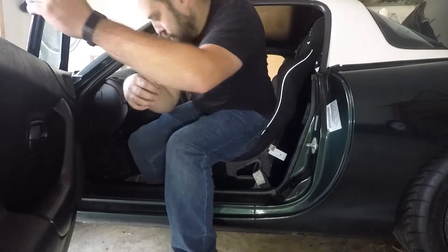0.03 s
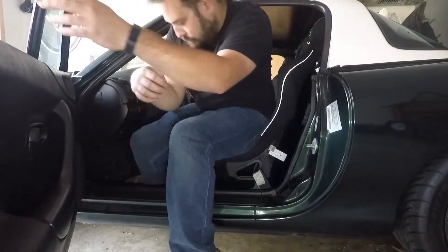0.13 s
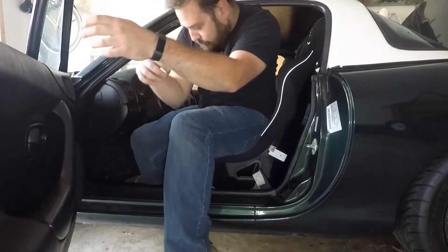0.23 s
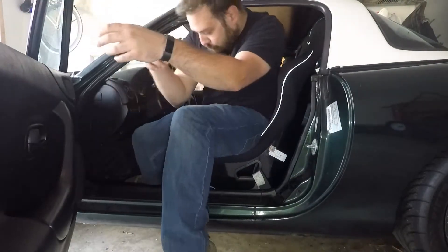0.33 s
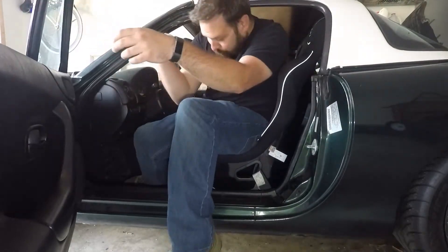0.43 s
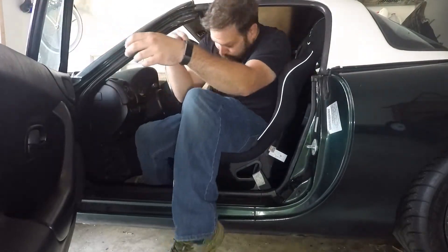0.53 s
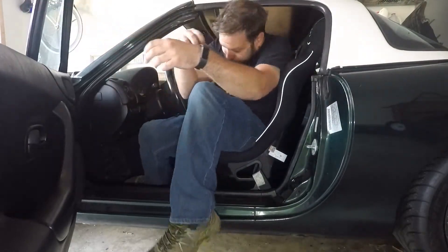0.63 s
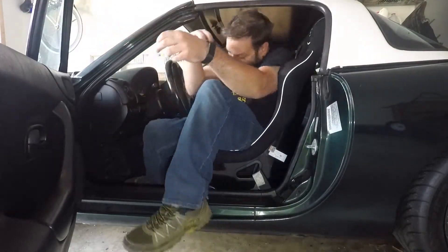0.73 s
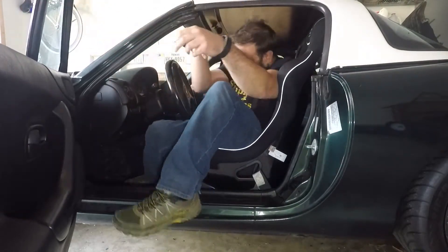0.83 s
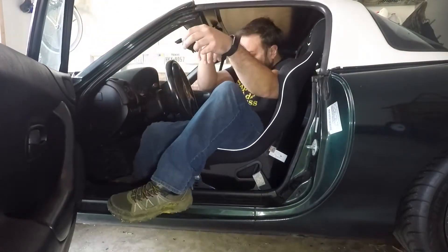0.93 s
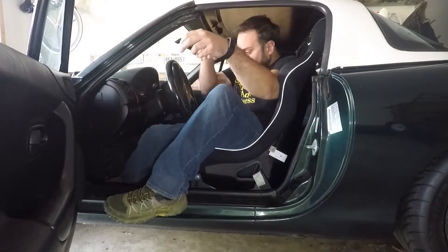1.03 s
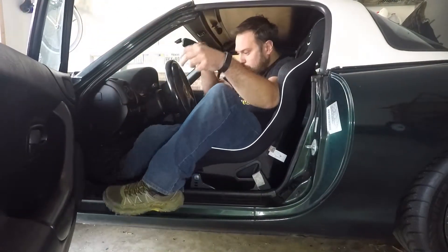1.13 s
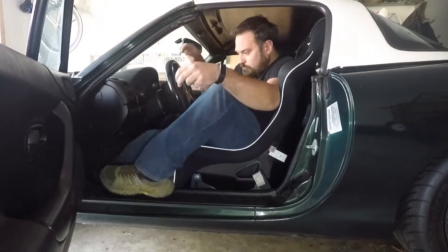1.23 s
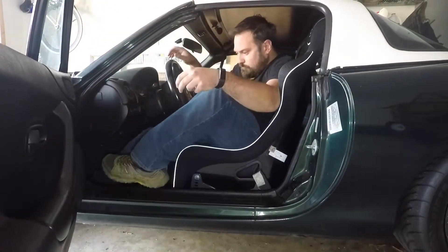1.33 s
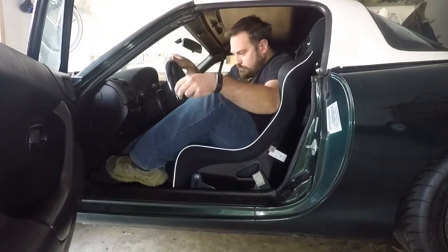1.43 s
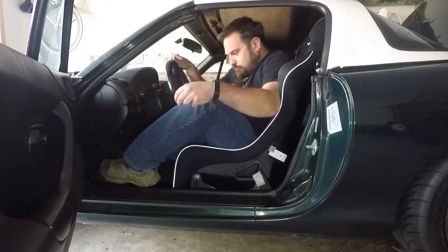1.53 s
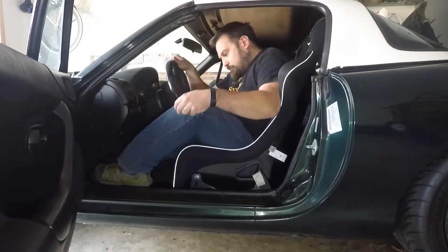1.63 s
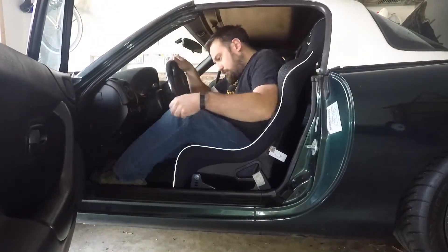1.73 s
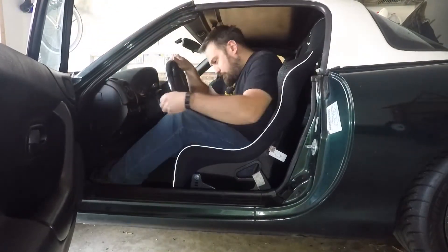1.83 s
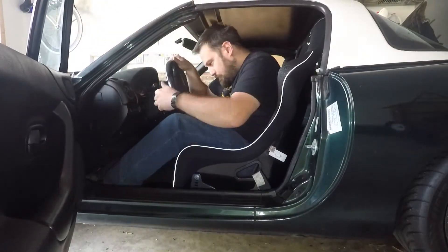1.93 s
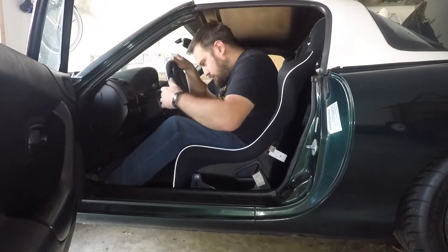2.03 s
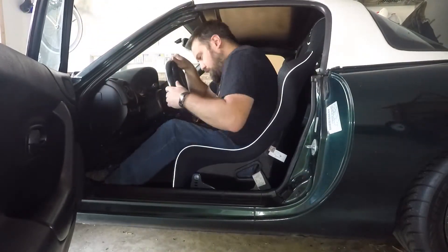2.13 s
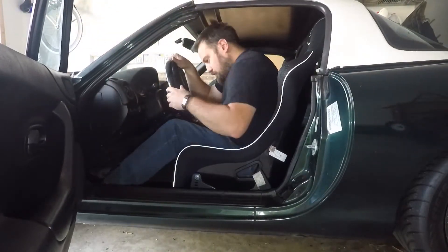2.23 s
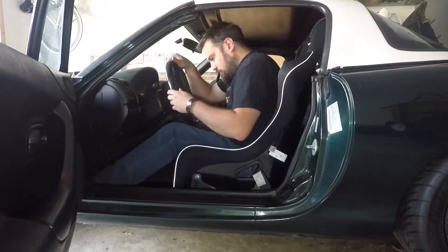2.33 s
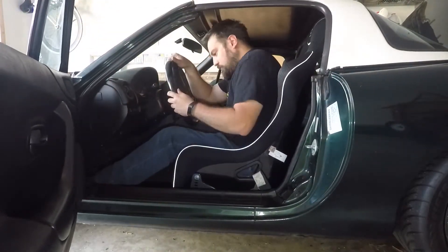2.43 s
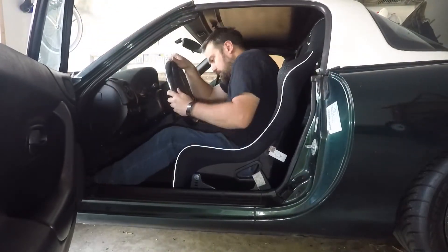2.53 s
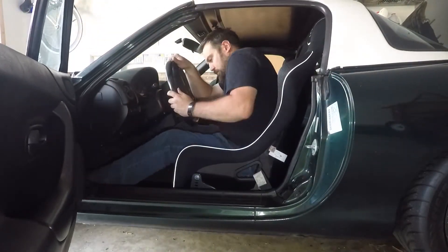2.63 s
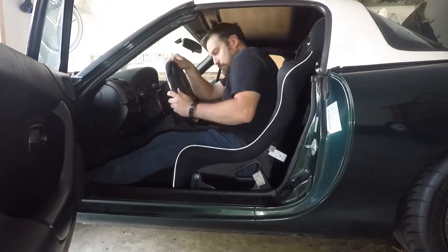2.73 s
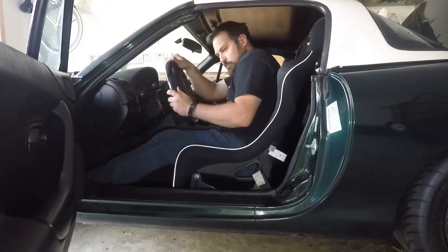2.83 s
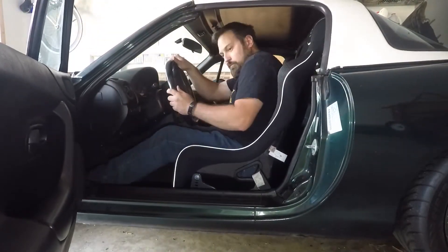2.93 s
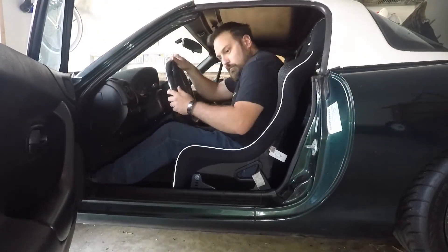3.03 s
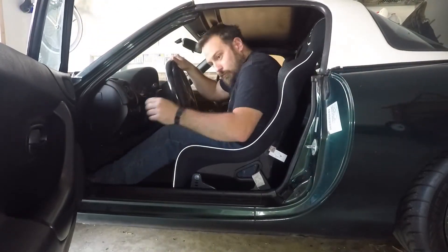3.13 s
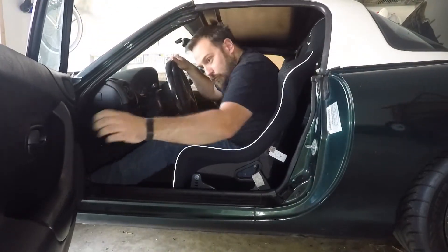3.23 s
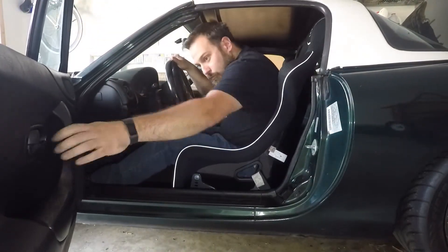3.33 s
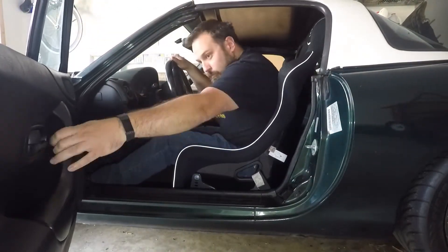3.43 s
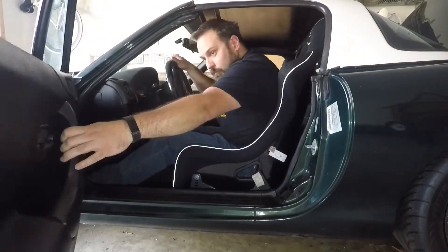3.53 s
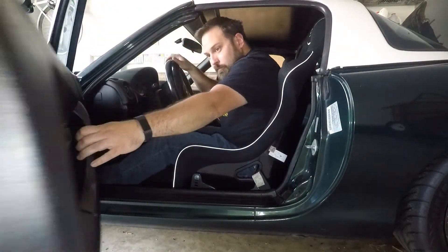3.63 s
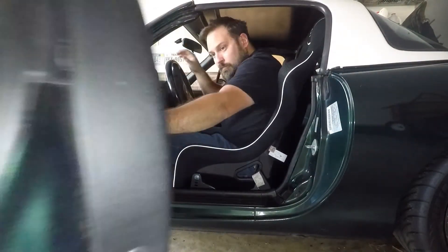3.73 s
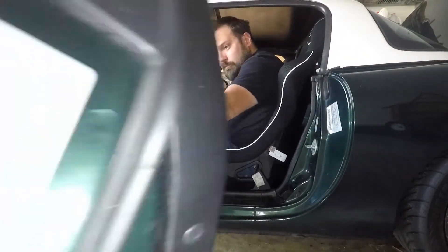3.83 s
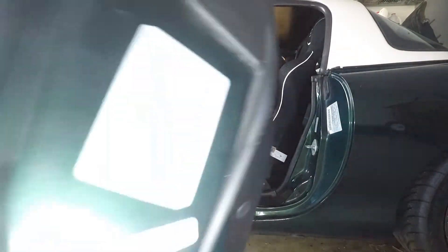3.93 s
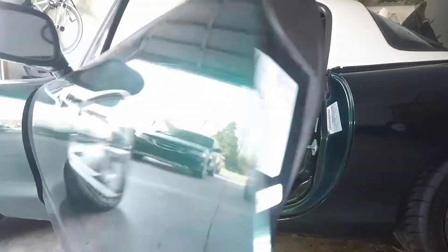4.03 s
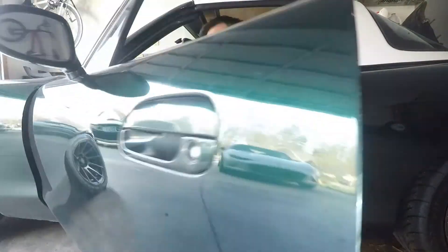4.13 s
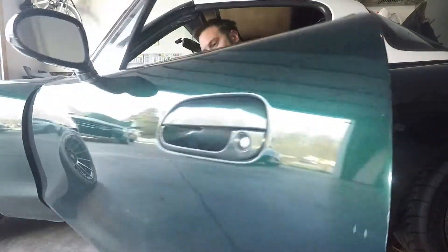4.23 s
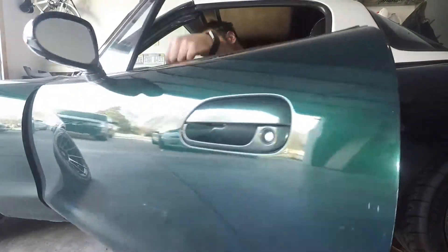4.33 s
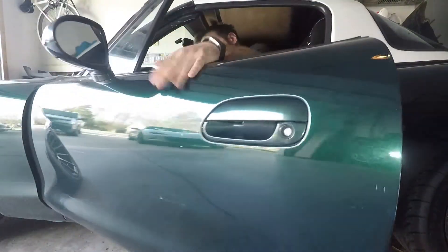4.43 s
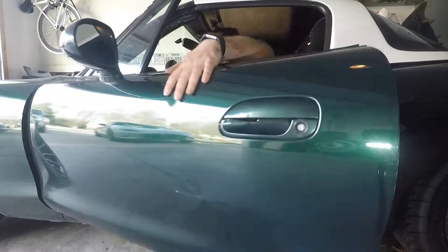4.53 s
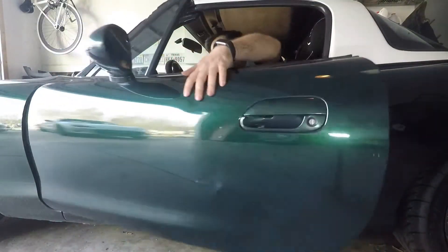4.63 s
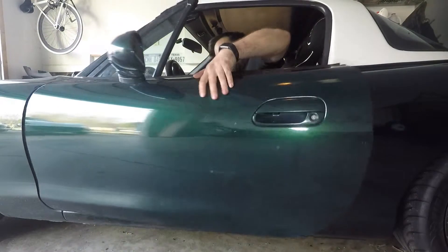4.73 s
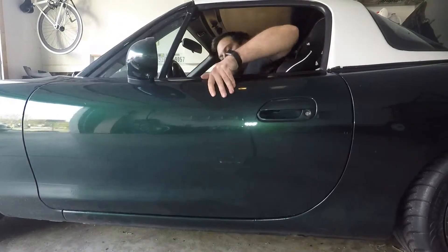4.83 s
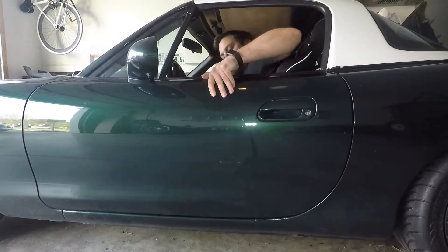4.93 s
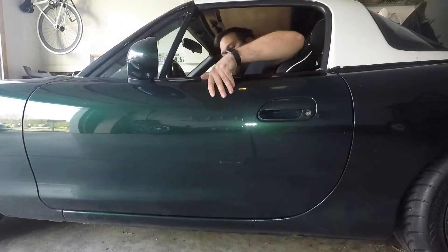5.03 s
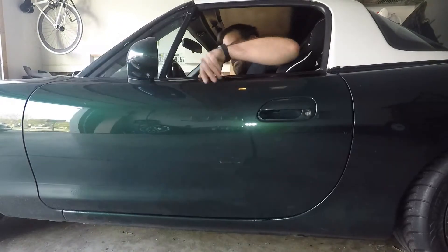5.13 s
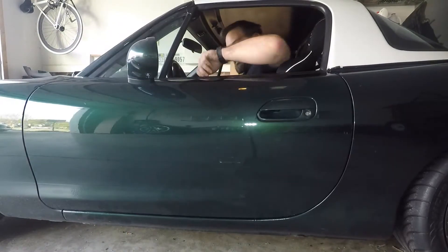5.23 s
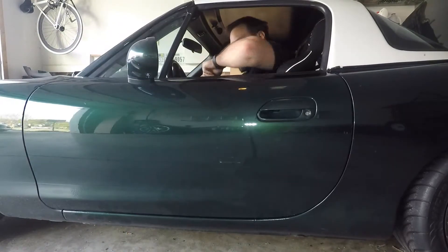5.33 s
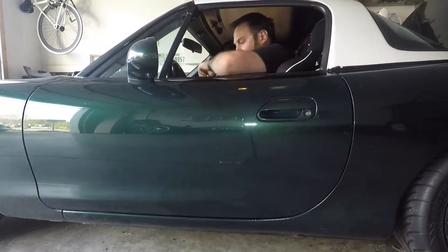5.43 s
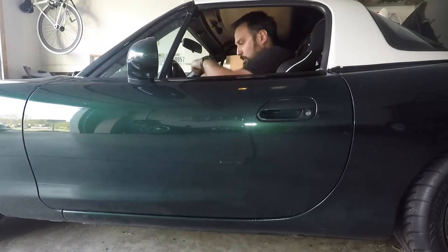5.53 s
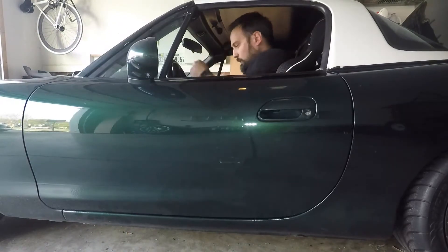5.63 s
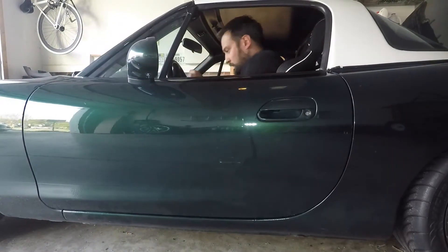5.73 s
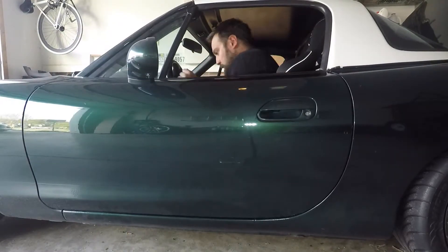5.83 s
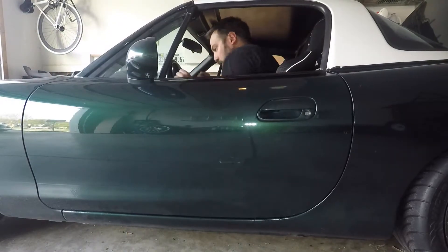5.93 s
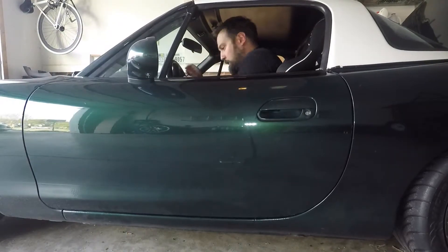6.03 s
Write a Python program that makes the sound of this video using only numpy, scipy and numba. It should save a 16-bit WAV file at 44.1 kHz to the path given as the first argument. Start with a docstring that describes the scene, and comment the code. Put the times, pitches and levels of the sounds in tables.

```python
"""In an open garage a distant machine, perhaps a rotor, buzzes and thumps about ten times a second.
From the start a driver climbs into a small car: cloth and soles rub, and shoes and knees knock.
Near 4.75 s the door slams: its panel rings, the latch snaps, the trim rattles and the garage echoes.
A small camera on the floor listens. It lets more bass through around 2 s and from the slam on,
and turns the loud slam down, recovering afterwards."""
import sys
import numpy as np
from scipy import signal
from scipy.fft import rfft, irfft
from scipy.io import wavfile
from scipy.ndimage import uniform_filter1d
from numba import njit

SR = 44100
rng = np.random.default_rng(int(sys.argv[2]) if len(sys.argv) > 2 else 0)


def generate_wav(signal):
    """Clip the signal to [-1, 1] and save it as 16-bit WAV at the path in sys.argv[1]."""
    frames = np.transpose(np.atleast_2d(signal))
    scaled = np.clip(frames, -1, 1) * 32767
    pcm = np.round(scaled).astype(np.int16)
    wavfile.write(sys.argv[1], SR, pcm)


N = 267907

# The machine's buzz over time: time_s, pulse_rate_hz, level_db, upper_harmonics_lift_db, tick_db
BUZZ_COURSE = [(0, 26.29, -47.5, -17, -83), (1.1, 26.31, -45.5, -2.5, -79), (2.2, 26.4, -44, 1, -107),
               (2.7, 25.93, -42.5, -4, -76), (3.4, 26.04, -43, -8, -57), (3.75, 26.27, -43, -3.5, -56),
               (4.1, 26.2, -43.5, 0.5, -56), (4.8, 26.35, -46, 7.5, -57), (5.4, 26.4, -45, 4, -60),
               (6.07, 26.48, -43.5, 6.5, -62)]
# How much of the air and rubbing noise both microphones share: pitch_hz, share (0 to 1)
NOISE_SHARE = [(100, 0.39), (350, 0.72), (700, 0.08), (2000, 0.069), (4000, 0.74), (8000, 0.045),
               (14000, 0.13)]
# The same for echo, rumble and door noise: pitch_hz, share (0 to 1)
ECHO_SHARE = [(100, 1), (300, 0.93), (600, 0.74), (1300, 0.014), (2300, 0.32), (4300, 0.81), (8000, 0.091),
              (14000, 0.17)]
# The camera case lifts the treble of close sounds and dulls the very top: pitch_hz, gain_db
CASE_TONE = [(6500, 0), (8000, 2), (10000, 6), (15000, -33)]


def undb(db):
    """Turn decibels into a gain."""
    return 10 ** (np.asarray(db) / 20)


def level(x, db):
    """Set a sound's average (RMS) level."""
    return x * undb(db) / np.sqrt(np.mean(x ** 2))


def curve(table):
    """Columns of a time table, one value per sample."""
    times, *columns = np.transpose(table)
    return [np.interp(np.arange(N) / SR, times, column) for column in columns]


def along(table, hz):
    """Look up a pitch in a table of pitch_hz, value."""
    pitches, values = np.transpose(table)
    return np.interp(np.log(hz + 1), np.log(pitches), values)


def shape(x, gain):
    """Filter a sound with a gain for each frequency."""
    n = x.shape[-1]
    even = n + n % 2
    return irfft(rfft(x, even) * gain(np.arange(even // 2 + 1) * SR / even), even)[..., :n]


def colour(x, tone):
    """Filter a sound with a table of pitch_hz, gain_db."""
    return shape(x, lambda f: undb(along(tone, f)))


def band(x, hz, width_hz):
    """A resonance: keep the sound near one pitch."""
    return signal.lfilter(*signal.iirpeak(hz, hz / width_hz, SR), x)


def walk(rate_hz):
    """A random wander, typically of size 1."""
    step = int(SR / rate_hz)
    wander = uniform_filter1d(np.repeat(rng.standard_normal(N // step + 1), step), step)[:N]
    return wander / wander.std()


def stereo_noise(tone, share, lag_samples=0):
    """Noise at two microphones: a shared part, which can reach the right later, plus their own."""
    common, left, right = colour(rng.standard_normal((3, N + N % 2)), tone)
    common = shape(common, lambda f: np.sqrt(along(share, f)))
    own = shape(np.array([left, right]), lambda f: np.sqrt(1 - along(share, f)))
    return (np.array([common, np.roll(common, lag_samples)]) + own)[:, :N]


def add(out, start_s, x):
    """Mix a sound in at a given time."""
    i = int(start_s * SR)
    out[..., i:i + x.shape[-1]] += x[..., :N - i]


def air():
    """A soft background hiss and a low rumble, both drifting in level."""
    # Tone of the hiss and of the rumble: pitch_hz, gain_db
    hiss_tone = [(210, -3.5), (350, -4.5), (400, -8), (550, -12), (870, -16.5), (1170, -14), (1420, -16),
                 (1630, -15), (2400, -20), (3260, -21), (4400, -21.5), (6500, -20), (7800, -28.5),
                 (10000, -29), (11500, -42), (15000, -59)]
    rumble_tone = [(20, 14), (45, 5), (100, 16), (130, 10.5), (170, 10.5), (260, 7), (400, -8), (600, -30)]
    hiss = level(stereo_noise(hiss_tone, NOISE_SHARE, lag_samples=12), -44.5) * undb(0.68 * walk(3.08))
    rumble = level(stereo_noise(rumble_tone, ECHO_SHARE), -44.5) * undb(3.3 * walk(4.06))
    return hiss + rumble


def buzz_phase():
    """How far the buzz has turned, in radians; each full turn is one pulse."""
    return 2 * np.pi * np.cumsum(curve(BUZZ_COURSE)[0]) / SR


def machine_buzz():
    """About 26 pulses a second make a wavering buzz, with a high tick on each pulse."""
    # Tones at whole multiples of the pulse rate: multiple, gain_db
    harmonics = [(2, -17), (3, -16), (4, -12), (5, -14.5), (6, -4.5), (7, -13.5), (8, 0.5), (9, -8),
                 (10, -16), (11, -13), (12, -3), (13, -15.5), (14, -16.5), (15, -29), (16, -23), (17, -22),
                 (18, -39), (20, -25.5)]
    _, level_db, lift_db, tick_db = curve(BUZZ_COURSE)
    phase, buzz = buzz_phase(), 0
    for multiple, gain_db in harmonics:
        gain = undb(gain_db + 1.82 * walk(4.4) + lift_db * (multiple > 10))
        smear = 0.021 * multiple ** 2  # the pulse arrives a little spread out
        buzz += gain * np.cos(multiple * phase + smear + 0.45 * walk(3.37))
    treble = band(band(rng.standard_normal(N), 6200, 2500), 6200, 2500)
    ticks = level(np.exp(60 * (np.cos(phase) - 1)) * treble, tick_db)
    return buzz * undb(level_db) + ticks * np.array([[1], [-1]])  # opposite signs sound wide


def machine_thumps():
    """Each thump is a short push of air, then a longer pull."""
    push_s, pull_s, lead_samples = 0.0024, 0.0051, 600
    out, t = np.zeros(N), np.arange(-lead_samples, 1200) / SR
    push = np.exp(-((t + 0.0035) / push_s) ** 2)
    pull = np.exp(-((t - 0.0045) / pull_s) ** 4)
    wave = push - pull * push.sum() / pull.sum()  # as much air returns as was pushed
    for time_s in np.arange(0.081, N / SR, 0.10245):
        late, size = rng.standard_normal(2)
        add(out, time_s - lead_samples / SR + 0.00058 * late, wave * undb(-29.5 + 1.2 * size))
    return out


def fibre_slips():
    """Many tiny, uneven slips of fibres blend into a rough noise."""
    return stereo_noise(CASE_TONE, NOISE_SHARE) * undb(1.4 * walk(300) + 0.54 * walk(40))


def rub_gains():
    """Gains of the four rubbing layers: every rub swells to a peak and dies away."""
    # Rubs of cloth and soles: peak_s, rise_s, fall_s, scuff_db, hiss_db, drag_db, groan_db
    rubs = [(0.021, 0.11, 0.18, -46, -51, -45, -49.5), (0.28, 0.17, 0.18, -51.5, -69, -77, -77),
            (0.5, 0.16, 0.25, -45.5, -62, -61, -67), (0.62, 0.26, 0.39, -39, -47, -71, -64),
            (0.72, 0.17, 0.36, -54, -43, -60, -47), (0.85, 0.31, 0.35, -53, -61, -42.5, -51),
            (1.16, 0.11, 0.17, -44, -46, -39.5, -46), (1.37, 0.066, 0.24, -51.5, -55, -52, -51),
            (1.5, 0.077, 0.71, -52.5, -52.5, -49.5, -57), (1.588, 0.046, 0.13, -42.5, -44.5, -49, -41),
            (1.835, 0.027, 0.11, -48, -48, -42.5, -42.5), (2.05, 0.14, 0.28, -48, -46.5, -41.5, -45),
            (2.105, 0.062, 0.057, -45, -55, -46, -48), (2.17, 0.025, 0.26, -62, -59, -48, -42),
            (2.33, 0.31, 0.31, -50.5, -55, -61, -53), (2.563, 0.026, 0.027, -41, -59, -57, -39),
            (2.64, 0.16, 0.33, -45, -53.5, -50, -40.5), (3.26, 0.19, 0.17, -56, -50, -46.5, -46),
            (3.37, 0.015, 0.033, -62, -43, -37, -40), (3.424, 0.022, 0.048, -47, -47, -37.5, -50),
            (3.46, .05, 0.66, -63, -52.5, -57, -52.5), (4.371, 0.016, 0.075, -42, -40, -45, -39),
            (4.41, 0.18, 0.42, -53, -49, -49.5, -48), (4.715, 0.087, 0.12, -58, -51, -44, -49),
            (6.0, 1, 0.27, -67, -56, -56.5, -59)]
    span_db, bluntness = 20, 0.054  # a rise or fall covers about span_db
    t, power = np.arange(N) / SR, 0
    for peak_s, rise_s, fall_s, *layer_db in rubs:
        away = np.where(t < peak_s, (peak_s - t) / rise_s, (t - peak_s) / fall_s)
        swell = undb(-span_db * (np.hypot(away, bluntness) - bluntness))
        power += (undb(layer_db)[:, None] * swell) ** 2
    return np.sqrt(power)


def rubbing():
    """Cloth and soles slide: a scuff, a hiss above it, a dull drag below, and the seat frame groans."""
    # Tone of the cloth hiss: pitch_hz, gain_db
    hiss_tone = [(1200, -49), (2100, -18), (2800, 1), (3500, 2), (4600, -1.5), (6000, 1), (7500, -12),
                 (10000, -24), (15000, -35)]
    scuff_slips, hiss_slips = fibre_slips(), fibre_slips()
    cut_lows = signal.butter(4, 1250, "high", fs=SR, output="sos")
    scuff = signal.sosfilt(cut_lows, band(band(scuff_slips, 1660, 750), 1690, 810))
    hiss = colour(hiss_slips, hiss_tone)
    drag = band(band(hiss_slips, 930, 1260), 930, 1260)
    groan = band(band(scuff_slips, 488, 410), 400, 370)
    layers = sum(level(x, 0) * gain for x, gain in zip((scuff, hiss, drag, groan), rub_gains()))
    return layers + whistles(scuff_slips)


def knocks():
    """Shoes, knees, seat and handle bump: a click, a dry knock and a low thud of floor or seat."""
    # Bumps: start_s, click_db, click_hz, knock_db, thud_db, thud_hz, left_minus_right_db
    bumps = [(0.278, -62, 2510, -60, -34, 202, -1), (0.981, -43, 3180, -49, -76, 218, -12),
             (1.157, -40, 1900, -41, -42, 270, 0), (1.1665, -32, 3250, -30, -30, 270, 0),
             (1.177, -55, 2810, -45, -22.5, 221, 0), (1.5767, -45, 3000, -43, -32, 233, -1),
             (1.5864, -34, 3840, -28, -22.5, 202, 0), (1.5882, -27, 2880, -28, -33, 186, 3),
             (1.594, -31, 4150, -29, -29, 186, -2), (1.8, -55, 3080, -41, -29.5, 229, 4),
             (1.836, -45, 1700, -40, -41, 230, 3), (1.8405, -32, 3200, -28.5, -31.5, 230, 0),
             (2.1757, -54, 1800, -35, -27.5, 294, 0), (2.2388, -56, 1800, -38, -30.5, 202, -1),
             (2.3008, -48, 3400, -64, -32, 206, 0), (2.5587, -42, 3300, -35, -37, 207, 9),
             (2.562, -50, 1700, -39, -45, 238, 2), (2.6144, -47, 1800, -29, -33.5, 400, 1),
             (2.6195, -52, 1800, -36, -28, 260, 1), (2.658, -51, 2660, -42, -29.5, 198, -1),
             (2.69, -43, 3280, -57, -31.5, 171, 1), (3.0003, -51, 3840, -48, -35, 218, 3),
             (3.239, -32.5, 4320, -31.5, -41, 306, 8), (3.2717, -36, 4600, -50, -43, 222, 4),
             (3.311, -39, 4000, -50, -46, 221, 2), (3.326, -37, 8200, -60, -55, 220, 2),
             (3.358, -37, 9200, -60, -55, 220, 9), (3.3428, -24.5, 4100, -26.5, -33, 230, 2.5),
             (3.3655, -26, 4300, -41, -39, 203, 4), (3.4106, -35, 4000, -41, -54, 248, 8),
             (3.4216, -24.5, 3480, -27.5, -49, 221, 6), (3.6048, -32.5, 4400, -59, -51, 212, -1),
             (4.3201, -36, 3460, -53, -33, 201, 1), (4.3605, -27.5, 5200, -49, -33, 169, 3),
             (4.369, -38, 3900, -35, -30.5, 218, -2), (4.3829, -41, 3600, -35, -26.5, 181, 1),
             (4.414, -46, 3600, -44, -28, 187, 3), (4.428, -40, 4000, -50, -47, 200, 1),
             (4.6427, -53, 3514, -58, -32.5, 200, 0), (4.699, -42, 3340, -35, -30, 210, 1)]
    click_fade_s, knock_fade_s, thud_hold_s = 0.0021, 0.0037, 0.01
    out, t = np.zeros((2, N)), np.arange(2 * int(0.07 * SR)) / SR
    for start_s, click_db, hz, knock_db, thud_db, thud_hz, pan_db in bumps:
        noise = rng.standard_normal((2, len(t)))
        noise[:, 0] = 3  # the first contact is sharp
        tick = noise[0] * np.exp(-t / click_fade_s)
        ring = band(tick, hz, hz * 0.2) + 0.72 * band(tick, 1.34 * hz, hz * 0.25)
        click = band(ring, 1.25 * hz, hz * 0.88) + 0.05 * band(tick, 12000, 5000)
        knock = band(band(noise[1] * np.exp(-t / knock_fade_s), 660, 1600), 660, 1600)
        thud_swell = np.exp(-(t / thud_hold_s) ** 2) * (1 - np.exp(-t / 0.0013))
        thud = np.sin(2 * np.pi * thud_hz * t) * thud_swell
        parts = (click, click_db), (knock, knock_db), (thud, thud_db)
        bump = colour(sum(x / np.abs(x).max() * undb(db) for x, db in parts), CASE_TONE)
        pair = np.array([bump, np.roll(bump, 2)])  # the left microphone hears it first
        add(out, start_s, pair * undb([[pan_db / 2], [-pan_db / 2]]))
    return out


def garage_echo(x):
    """The garage returns a wash of echo, each octave fading at its own pace."""
    # Time the echo takes to fall by 60 dB: pitch_hz, fade_s
    fades = [(100, 0.43), (300, 0.65), (700, 0.88), (1300, 1.066), (2500, 0.88), (4000, 0.4), (7000, 0.27),
             (13000, 0.41)]
    t, tail = np.arange(2 * int(0.75 * SR)) / SR, 0
    tone = [(20, -34), (200, -10.5), (600, -2), (20000, 0)]  # pitch_hz, gain_db
    noise = stereo_noise(tone, ECHO_SHARE)[:, :len(t)]
    for hz in 40 * 2. ** np.arange(10):
        octave = shape(noise, lambda f: np.cos(np.pi / 2 * np.clip(np.log2((f + 1) / hz), -1, 1)) ** 2)
        tail += octave * undb(-60 * t / along(fades, hz))
    tail *= np.minimum(t / 0.019, 1)  # the echo takes a moment to build
    tail /= np.sqrt(np.sum(tail ** 2) / 2)
    return signal.fftconvolve(x.mean(0)[None], tail, axes=1)[:, :N]


def whistles(slips):
    """Narrow bands of the slip noise make thin whistles that flicker with the buzz."""
    # Whistles: start_s, end_s, pitch_hz, width_hz, level_db
    notes = [(2.43, 2.49, 3050, 80, -58), (2.7, 3.25, 2930, 70, -66), (3.149, 3.6, 3280, 70, -65.5),
             (3.72, 4.28, 3260, 89, -65), (4.0, 4.26, 2300, 69, -67), (3.72, 4.25, 3300, 50, -66.5),
             (3.78, 4.1, 3200, 60, -68), (3.7, 5.2, 4733, 86, -64.5), (4.685, 4.72, 1000, 110, -51)]
    t, out, fade_db_per_s = np.arange(N) / SR, 0, 160
    for start_s, end_s, hz, width_hz, db in notes:
        fade_db = fade_db_per_s * np.maximum(0, np.maximum(start_s - t, t - end_s))
        flicker_db = 2.7 * walk(30) + 4 * np.cos(buzz_phase())
        out += level(band(slips, hz, width_hz), db) * undb(flicker_db - fade_db)
    return out


def door_slam():
    """The door lands on seal, latch and frame, then rebounds; each blow rings, snaps and rattles."""
    # Blows and their relative strengths: start_s, ring_db, snap_db, rattle_db
    blows = [(4.748, -44, -48, -44), (4.7522, -26, -16, -22), (4.7555, -7, -0.5, -13),
             (4.7613, -20, -3.5, -18), (4.7665, -16.5, -6.5, -15.5), (4.7787, -16, -20, -20),
             (4.793, -12, -22, -25), (4.809, -16, -27, -21), (4.828, -18.5, -22, -21),
             (4.875, -20, -19, -24), (4.908, -24, -17, -26), (4.94, -23, -20, -32.5), (4.96, -32, -28, -47)]
    # Ringing tones of the door panel: pitch_hz, gain_db, fade_s (to fall by 60 dB)
    panel_tones = [(95.8, -14, 0.34), (75.4, -14.5, 0.44), (149, -2.5, 0.31), (176, 4, 0.2),
                   (198, -3, 0.32), (227.8, -1.5, 0.34), (246.3, -0.5, 0.3), (287, -13, 0.47),
                   (319.3, -2, 0.32), (402, -8, 0.29), (463, -11, 0.3), (507, -12, 0.19),
                   (601, -10.5, 0.44), (1126, -6, 0.09), (1335, -19, 0.23)]
    # Tone of the latch, and of the glass and trim: pitch_hz, gain_db
    latch_tone = [(470, -40), (800, 0), (1630, 3.5), (2930, -22), (4080, -9.5), (4670, -22), (6270, -11),
                  (7630, -25), (9400, -34), (10900, -47), (13200, -40), (15000, -47)]
    trim_tone = [(110, -5.5), (280, -1.5), (480, -3), (891, -4.5), (1540, -4.5), (2370, -13), (2660, -15),
                 (3980, -19.5), (6140, -20), (9050, -36.5), (10600, -53), (13000, -52), (14100, -57),
                 (15000, -109)]
    out, t = np.zeros((2, N)), np.arange(int(0.6 * SR)) / SR
    cushion = 1 - np.exp(-(t / 0.0021) ** 2)  # rubber seals soften the contact
    latch, trim = (level(stereo_noise(tone, ECHO_SHARE), 0) for tone in (latch_tone, trim_tone))
    for i, (start_s, ring_db, snap_db, rattle_db) in enumerate(blows):
        ring = 0
        for hz, db, fade_s in panel_tones:
            louder, detune, phase = rng.uniform(-1.33, 1, 3)
            fade = undb(db + 1.5 * louder - 60 * t / fade_s)
            ring += fade * np.sin(2 * np.pi * hz * (1 + 0.012 * detune) * t + 0.6 * phase)
        stretch = i * len(t) // 2 + np.arange(len(t))  # each blow starts further into the noise
        snap = latch[:, stretch] * np.exp(-t / 0.0039) * (1 - np.exp(-t / 0.00029))
        rattle = trim[:, stretch] * np.exp(-t / 0.11)
        body = undb(ring_db) * ring + undb(rattle_db) * rattle
        add(out, start_s, cushion * body + undb(snap_db) * snap)
    return out


def case_shading(x):
    """The camera case shades the slam and its echo differently at each microphone."""
    # Balance: pitch_hz, left_minus_right_db
    balance = [(150, 0), (400, 0.5), (700, 2), (1270, -5), (2300, -1), (4300, -1.5), (8000, 0), (14000, -2)]
    return shape(x, lambda f: undb(along(balance, f) / 2 * np.array([[1], [-1]])))


def cabin_boom():
    """The slam booms in the air of the car: two deep pulses, the second stronger."""
    # Air pulses: centre_s, gain_db, half_length_s
    pulses = [(4.796, -20, .022), (4.848, -13.5, 0.023)]
    out, pitch_hz = 0, 39.5
    for centre_s, db, half_s in pulses:
        t = np.arange(N) / SR - centre_s
        out += undb(db) * np.exp(-(t / half_s) ** 2) * np.cos(2 * np.pi * pitch_hz * t)
    return out


def scene():
    """Mix all the sources; only the knocks and the slam get an echo."""
    bumps, slam = knocks(), door_slam() + cabin_boom()
    background = air() + machine_buzz() + machine_thumps()
    driver = rubbing() + bumps + undb(-6.5) * garage_echo(bumps)
    door = case_shading(undb(4) * slam + undb(-2.5) * garage_echo(slam))
    return background + driver + door


@njit
def follow(x, rise_s, fall_s):
    """Track a level, rising and falling at separate speeds."""
    held, out = 0., np.empty(len(x))
    for i in range(len(x)):
        held += (x[i] - held) / (SR * (rise_s if x[i] > held else fall_s))
        out[i] = held
    return out


def record(dry):
    """The camera holds back the bass by a changing amount, turns loud sound down and cuts the top."""
    # Gain of the bass below the low-cut: time_s, gain_db
    bass_course = [(0, -35), (1.55, -32), (1.85, -7), (2.3, -9.5), (3.0, -19), (4.736, -30), (4.752, -5),
                   (4.8, -1), (5.4, 1), (5.75, 4.5), (6.07, 3)]
    lowcut_hz, top_hz, threshold_db = 134.7, 15100, -20
    bass = shape(dry, lambda f: 1 / (1 + (f / lowcut_hz) ** 36))
    x = dry + (undb(curve(bass_course)[0]) - 1) * bass
    loudness = follow(np.abs(x).max(0), rise_s=0.00089, fall_s=0.25)
    gain = 1.033 * np.minimum(1, undb(threshold_db) / (loudness + 1e-9)) ** 0.26
    rounded = np.tanh(x * gain)  # softens the tallest peaks
    return signal.sosfilt(signal.ellip(14, 0.3, 60, top_hz, fs=SR, output="sos"), rounded)


dry = scene()
out = record(dry)
generate_wav(out)
```